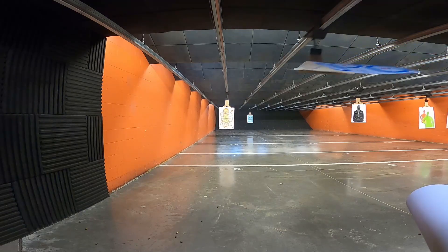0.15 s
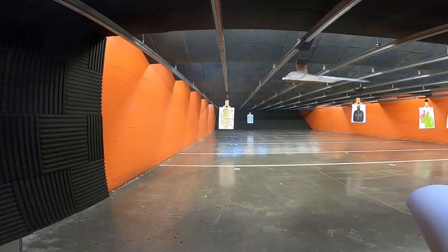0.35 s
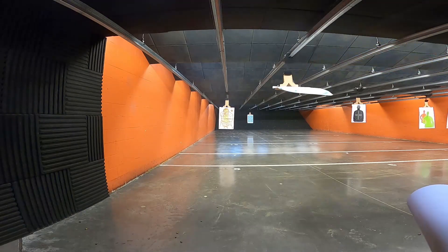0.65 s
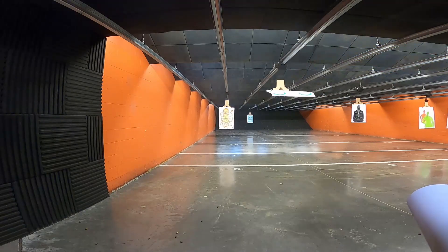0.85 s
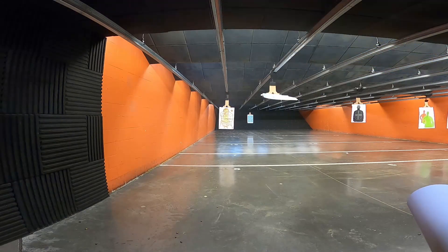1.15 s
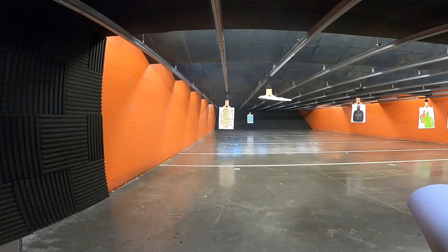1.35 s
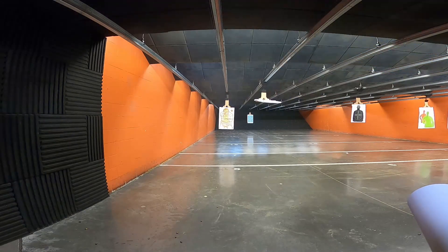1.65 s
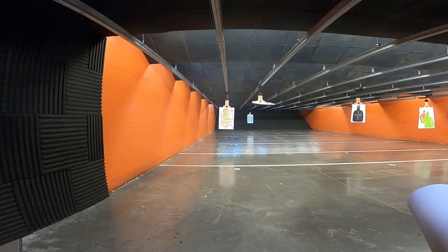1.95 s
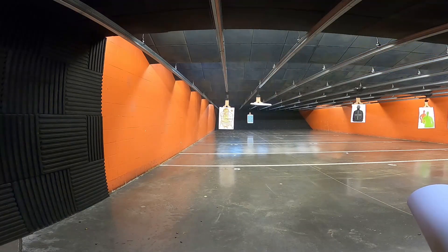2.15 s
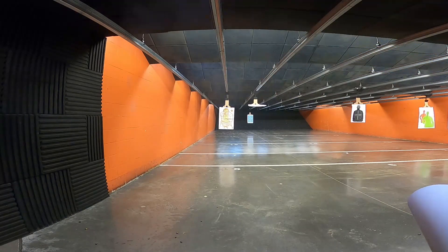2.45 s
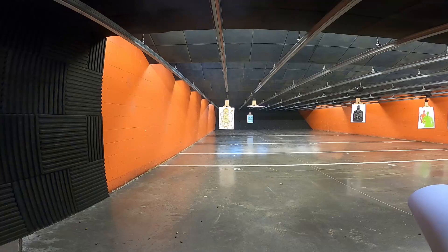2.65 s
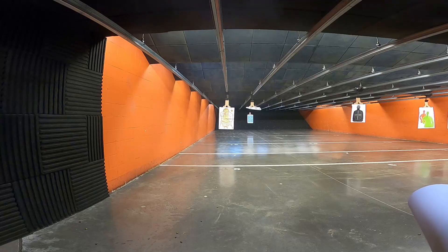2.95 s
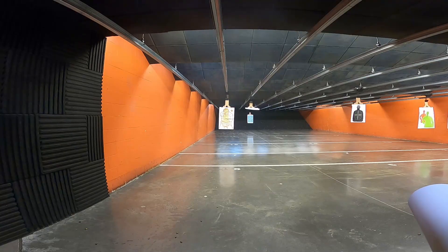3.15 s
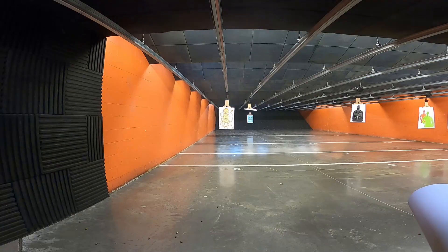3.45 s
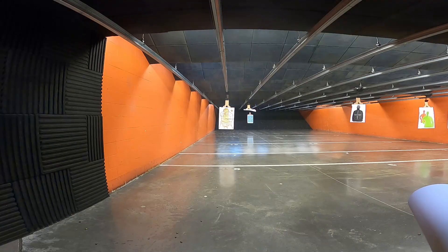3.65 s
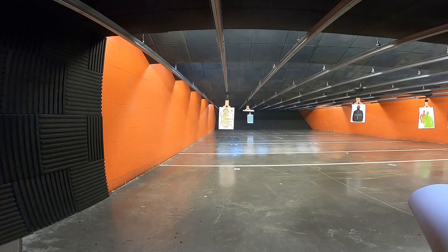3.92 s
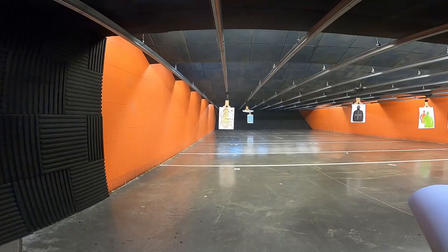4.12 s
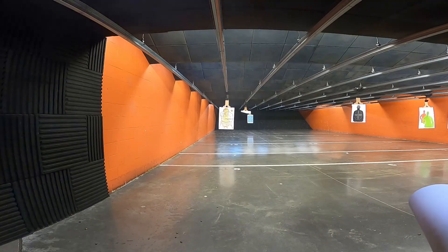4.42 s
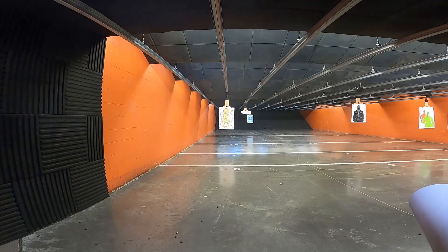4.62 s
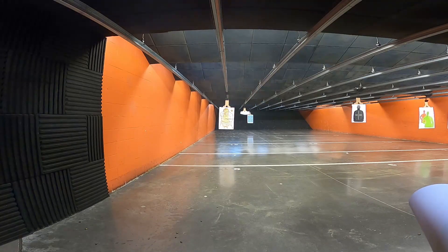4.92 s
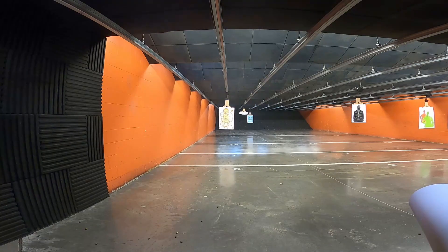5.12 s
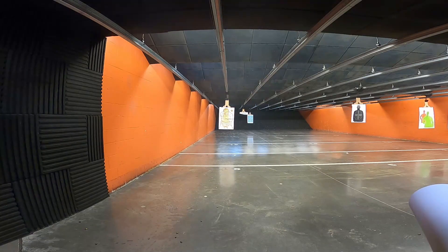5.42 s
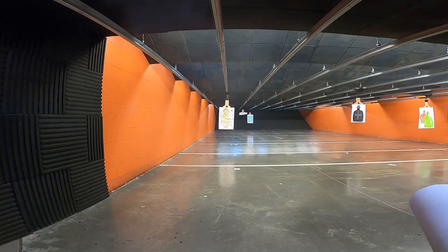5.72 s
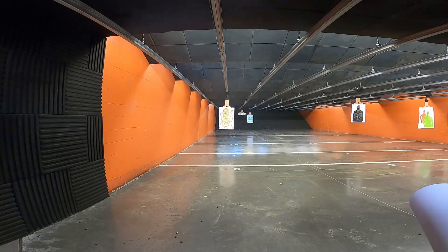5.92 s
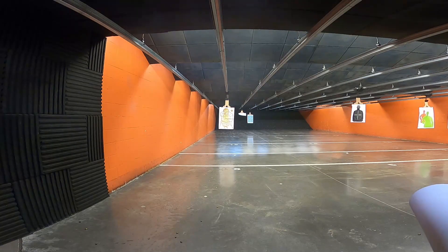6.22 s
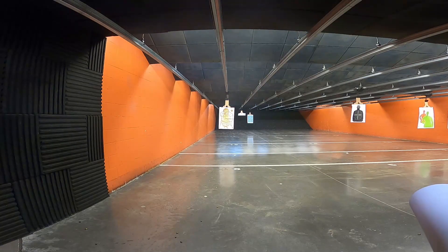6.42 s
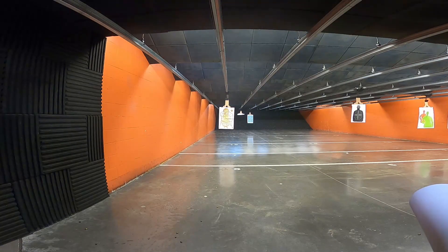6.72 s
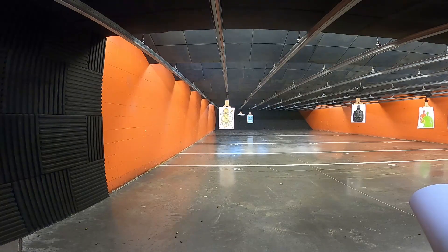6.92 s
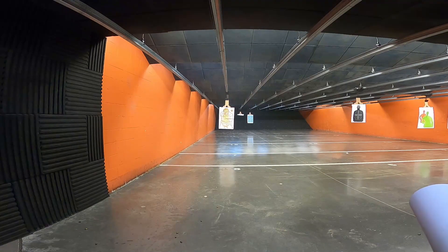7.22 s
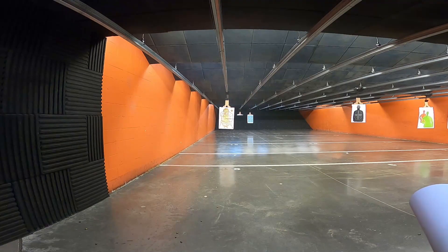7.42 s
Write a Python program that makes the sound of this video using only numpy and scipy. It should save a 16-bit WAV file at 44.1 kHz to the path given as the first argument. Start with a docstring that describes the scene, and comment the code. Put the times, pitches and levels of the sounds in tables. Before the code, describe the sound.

Two pistols fire six single shots at uneven intervals in a long concrete indoor range: one sharp and bright to the left, one duller and heavier to the right. Two come at once, then a pause, three more, another gap and a last one. Each leaves a short dense echo tail. Between them faint brass cases clink, a target carrier rolls and ventilation hums. The close stereo microphone overloads on each blast.

```python
"""Two pistols fire in a long concrete shooting range: a bright one to the left, a duller one to the right.
Each shot is push-suction pulses over bouncing paths, a noise crackle, slaps and swells, and a banded tail.
Brass cases clink (ticks and wavering modes), a carrier rolls and knocks on its rail, soft taps thud.
Ventilation (drifting noise, wavering tones) hums over a deep rumble.
The recorder overloads on each blast; its gain control creeps back up between shots."""
import sys
import numpy as np
from scipy import signal
from scipy.fft import rfft, irfft
from scipy.io import wavfile
from scipy.ndimage import uniform_filter1d

SR = 44100
rng = np.random.default_rng(int(sys.argv[2]) if len(sys.argv) > 2 else 0)


def put_to_file(sound):
    """Save the sound as 16-bit audio at rate SR, in the file named by the first command-line argument."""
    columns = np.atleast_2d(sound).T  # one column per channel
    safe = np.clip(columns, -1, 1)
    whole_steps = np.round(safe * 32767)
    wavfile.write(sys.argv[1], SR, whole_steps.astype(np.int16))


N = 333837

# Shots: t/s, level/dB, pistol (0 dull right, 1 bright left)
SHOTS = [(0.0261, -0.02, 0), (0.4064, -0.074, 1), (2.568, 0.34, 1), (3.4270, 0.44, 0), (4.1477, 0.54, 1),
         (5.681, -0.28, 1)]
# Per pistol: left lag/ms, upper edge f/Hz, low push level/dB, crack level/dB, crack decay/s,
# crack left-right/dB, tail rise/s
PISTOLS = [(0.1, 2000, -14, -21, 0.0061, 4.5, 0.016), (-.03, 6500, -5, -6.5, 0.011, 10, 0.011)]
# Mix per pistol: blast level/dB, reverberation level/dB
PISTOL_LEVELS = [(8.5, -8.5), (1, -7)]
# Bounces off booth, floor and walls, per pistol: first gap/ms, gap growth exponent, fade/ms,
# direct push/ms, reflected push/ms, mean height, height scatter
BOUNCES = [(0.878, 1.6, 3.7, 0.19, 0.48, 1, 0.72), (.4, 1.3, 5.4, 0.1, 0.16, .05, 1.45)]
# Slaps and early swells after the blast, per pistol: delay t/s, level/dB, decay/s
SLAPS = [
    [(.006, -10.5, 0.013), (.018, -9, 0.014), (.031, -12, 0.008), (.046, -8.5, 0.033)],
    [(.0432, -7, 0.0062), (.052, -14, 0.013), (.121, -22.5, 0.034), (.222, -31, .006)],
]
# Spectrum of slaps and swells, per pistol: f/Hz, relative level/dB per Hz
SLAP_COLOURS = [
    [(35, -33), (60, 2.5), (293, -1), (777, -10), (1070, -4), (1760, -14.5), (3000, -17.5), (5090, -26),
     (8980, -37.5), (13500, -52)],
    [(120, -21), (200, 0.5), (537, -9.5), (1110, -3.5), (2800, -9), (6790, -24), (12600, -37.5),
     (13500, -62)],
]
# Reverberation spectrum, per pistol: f/Hz, relative level/dB per Hz
TAIL_COLOURS = [
    [(18, -52), (30, -14), (60, -3.5), (86, -5.5), (143, 3), (189, 1), (377, -8.5), (487, -11.5),
     (582, -5.5), (1220, -16.5), (4170, -23.5), (8520, -37), (13500, -51)],
    [(18, -48), (30, -18.5), (146, 4), (323, -12.5), (367, -10.5), (407, -14.5), (678, -12.5), (811, -18.5),
     (1220, -20), (1890, -25), (4270, -28), (8310, -38.5), (13500, -55.5)],
]


def shots():
    """Shots: one fixed room tail per pistol; near bounces and strength vary from shot to shot."""
    mix = np.zeros((2, N))
    tails = [reverberation(colour, pistol[-1]) for colour, pistol in zip(TAIL_COLOURS, PISTOLS)]
    for s, db, k in SHOTS:
        blast_db, tail_db = PISTOL_LEVELS[k]
        blast = front(arrivals(*BOUNCES[k]), SLAPS[k], SLAP_COLOURS[k], *PISTOLS[k][:-1])
        add(mix, s, gain_of(db + blast_db) * blast)
        add(mix, s, gain_of(db + tail_db) * tails[k])
    return mix


# Crackle spectrum: f/Hz, relative level/dB per Hz
CRACK_COLOUR = [(180, -20), (300, -5), (720, -16.5), (1130, -6.5), (1600, -2), (1790, -15.5), (3430, -6),
                (4430, -17.5), (5360, -21.5), (5800, -27), (8110, -19), (12500, -51.5), (13500, -49)]
# Cavity at the microphone ports: f/Hz, width/Hz, height (linear)
PORT_CAVITY = (5180, 580, 2.13)


def front(paths, slaps, slap_colour, lag_ms, edge_hz, push_db, crack_db, crack_s, pan_db):
    """Blast wave: push-suction pulse per path, near-reflection crackle, cavity ring, low push, slaps."""
    out = np.zeros((2, SR // 4))
    ms = np.arange(SR // 4) * 1000 / SR
    side_lag_ms = np.array([[max(lag_ms, 0)], [max(-lag_ms, 0)]])
    for delay_ms, left, right, push_ms in paths:
        u = np.maximum(ms - delay_ms - side_lag_ms, 0) / push_ms
        pulse = (u > 0) * (1 - u) * np.exp(-.2 * u ** 2)  # push, then suction
        out += np.array([[left], [right]]) * pulse
    out = signal.lfilter(*signal.butter(2, edge_hz, fs=SR), out)
    add(out, 0, gain_of(crack_db) * sides_of(pan_db) * burst(CRACK_COLOUR, 0.00017, crack_s))
    hz, width_hz, height = PORT_CAVITY
    out = out + height * signal.lfilter(*signal.iirpeak(hz, hz / width_hz, fs=SR), out)
    # air of the booth heaves
    heave = np.sin(2 * np.pi * 135 * ms / 1000) * np.exp(-ms / 14.5) * np.minimum(ms / 3.3, 1)
    out -= gain_of(push_db) * heave
    for delay_s, db, decay_s in slaps:
        add(out, delay_s, gain_of(db) * burst(slap_colour, 0.0016, decay_s))
    return out


BOUNCE_COUNT = 10  # paths, direct one included
BOUNCE_LIKENESS = 0.82  # left-right


def arrivals(gap_ms, growth, fade_ms, direct_ms, reflected_ms, mean, scatter):
    """Blast paths, ever further apart and fading: rows of delay/ms, left height, right height, push/ms."""
    k = np.arange(BOUNCE_COUNT)
    draw = rng.standard_normal((BOUNCE_COUNT, 3))
    delay_ms = gap_ms * k ** growth * (1 + 0.088 * draw[:, 0])
    fade = np.exp(-delay_ms / fade_ms)[:, None]
    same = BOUNCE_LIKENESS
    sides = np.c_[draw[:, 1], same * draw[:, 1] + np.sqrt(1 - same ** 2) * draw[:, 2]]
    heights = (mean + scatter * sides) * fade
    # set each side's overall strength before the direct path replaces row 0
    usual = np.hypot(mean, scatter)
    heights = heights * usual * np.linalg.norm(fade) / np.linalg.norm(heights, axis=0)
    heights[0] = 0.72  # direct path
    return np.c_[delay_ms, heights, np.where(k > 0, reflected_ms, direct_ms)]


# Band decay ahead of the knee: f/Hz, t60/s
BAND_T60 = [(40, 0.95), (80, 0.99), (160, 0.59), (320, 0.73), (640, 0.77), (1250, 1), (2500, 0.76),
            (5000, 0.56), (10000, 0.42)]
# Room resonances: f/Hz, width/Hz, lift/dB
ROOM_MODES = [(115, 43, -4), (151, 43, 1.5), (261.7, 20, 4), (311, 65, 2), (369.4, 24, 5), (600, 13, -2),
              (919, 12, -1), (1070, 19, 5), (1150, 11, 4), (1554, 140, 5.5), (1557, 18, 4)]
# Faster decay once the far end of the hall has answered
KNEE_S, KNEE_DB_PER_S = 0.19, -11.5


def reverberation(colour, rise_s):
    """Octave bands of diffuse sound, each with its own decay; bass builds more slowly."""
    n = 2 * SR
    t, hz = np.arange(n) / SR, np.fft.rfftfreq(n, 1 / SR)
    spectrum = diffuse(n, lambda f: read(colour, f) + bumps(ROOM_MODES, f))
    out = np.zeros((2, n))
    for k, (f, t60) in enumerate(BAND_T60):
        share = read([(g, j == k) for j, (g, _) in enumerate(BAND_T60)], hz)
        build = 1 - np.exp(-t / (rise_s + 0.24 / f))
        out += irfft(spectrum * share, n) * gain_of(-60 * t / t60) * build
    out += standing_waves(n)
    knee_db = KNEE_DB_PER_S * np.maximum(t - KNEE_S, 0)
    clumps_db = 0.92 * wander(n, 0.0026)  # reflections arrive in clumps
    return out * gain_of(knee_db + clumps_db)


# Standing waves ahead of the knee: f/Hz, level/dB, t60/s
STANDING = [(104.9, -24.5, 0.93), (142.3, -18, 0.99), (157.2, -9, 0.92), (190, -29, 1), (256, -10.5, 0.7),
            (371, -24.5, 0.98), (1191, -7, 0.4), (1214, -7.5, 0.32)]


def standing_waves(n):
    """Single room modes that build up after a blast and ring on as decaying sines."""
    t = np.arange(n) / SR
    build = 1 - np.exp(-t / 0.017)
    out = np.zeros(n)
    for hz, db, t60 in STANDING:
        out += gain_of(db - 60 * t / t60) * np.sin(2 * np.pi * (hz * t + rng.random())) * build
    return out


# Cases hitting the floor: t/s, tick level/dB, ring level/dB, left-right/dB
CLINKS = [(0.861, -61, -77, 4), (1.286, -54.5, -77, 4.0), (1.9, -75, -71, 10), (2.4294, -67, -74, -1),
          (3.3119, -54, -78, 3.0), (3.9467, -63, -84, 6), (4.935, -59.5, -78, 5), (5.2594, -71, -81, 4),
          (5.5326, -55.5, -82, 1.5), (6.522, -58.5, -67.5, 6), (7.2644, -70, -76, 12), (7.54, -70, -73, 12)]
# High tube modes: f/Hz, level/dB re ring, t60/s
TUBE_MODES = [(11200, 0.5, 0.33), (12850, -5, 0.25)]
# Short mode after the tick: f/Hz, level/dB re tick, t60/s
BODY_MODE = (6000, -8, 0.088)
# Tick spectrum, also of the rail knocks: f/Hz, relative level/dB per Hz
TICK_COLOUR = [(880, -33), (1500, -23), (3340, -9), (4440, -1), (4870, 3), (11100, -15.5), (13500, -38)]


def brass():
    """Brass cases: a tick smeared by the room, then tube modes ringing unevenly as the case tumbles."""
    mix = np.zeros((2, N))
    for s, tick_db, ring_db, pan_db in CLINKS:
        sides = sides_of(pan_db)
        tick = burst(TICK_COLOUR, 0.0028, 0.02)
        tube = sum(ring(*mode) for mode in TUBE_MODES)
        add(mix, s, gain_of(tick_db) * sides * tick)
        add(mix, s, sides * (gain_of(tick_db) * ring(*BODY_MODE) + gain_of(ring_db) * tube))
    return mix


def ring(hz, db, t60):
    """Decaying mode that wavers in pitch and level."""
    t = np.arange(SR // 4) / SR
    turns = np.cumsum(hz + 70 * wander(len(t), 0.0014)) / SR
    level_db = db - 60 * t / t60 + 4.6 * wander(len(t), 0.0044)
    return gain_of(level_db) * np.sin(2 * np.pi * turns) * np.minimum(t / 0.0012, 1)


# Carrier wheels over rail joints: t/s, level/dB
KNOCKS = [(1.1265, -60), (1.6217, -60), (1.7953, -56), (1.93, -52.5), (2.0971, -69), (2.2108, -52.5),
          (2.312, -58), (3.9675, -59), (4.8723, -61), (5.1327, -67)]
# Rail mode: f/Hz, level/dB re knock, t60/s
RAIL_MODE = (4860, -1.5, 0.13)


def rail_knocks():
    """Rail joints: each knock is a soft tick that rings the rail."""
    mix = np.zeros((2, N))
    for s, db in KNOCKS:
        add(mix, s, gain_of(db) * burst(TICK_COLOUR, 0.003, 0.021))
        add(mix, s, gain_of(db) * ring(*RAIL_MODE) * np.ones((2, 1)))
    return mix


# Dull taps down the range: t/s, level/dB
THUDS = [(5.255, -57), (5.291, -53.5), (7.225, -54), (7.51, -57)]
# Tap spectrum: f/Hz, relative level/dB per Hz
THUD_COLOUR = [(400, -25), (900, -11), (1400, 6), (2000, -8), (4000, -5), (8000, -29)]


def thuds():
    """Soft taps blurred by the room: slow-rising noise bursts."""
    mix = np.zeros((2, N))
    for s, db in THUDS:
        add(mix, s, gain_of(db) * burst(THUD_COLOUR, 0.0077, 0.039))
    return mix


# Rolling noise level: t/s, level/dB
CARRIER_LEVEL = [(0, -51.5), (1.1, -56), (2.501, -46.5), (3.202, -57), (4.002, -55.5), (4.798, -59),
                 (5.3, -55), (6.4, -60), (7.25, -55.5), (7.57, -62)]
# Rolling noise spectrum: f/Hz, relative level/dB per Hz
RAIL_COLOUR = [(47, -43), (80, 1.5), (375, -12), (506, -13.5), (885, -14.5), (1010, -11.5), (4820, -23.5),
               (11400, -43.5), (13500, -53)]


def carrier():
    """Target carrier rolling along its rail, with other bustle down the range: drifting noise."""
    level_db = np.interp(np.arange(N) / SR, *np.transpose(CARRIER_LEVEL))
    return gain_of(level_db) * drifting(lambda hz: read(RAIL_COLOUR, hz), patchy_db=2.44, flicker_db=1.47)


# Air noise spectrum: f/Hz, relative level/dB per Hz
VENT_COLOUR = [(41, -56), (70, -8.5), (106, 3.5), (193, -9.5), (399, -19), (592, -28.5), (722, -17),
               (2220, -21.5), (3680, -33), (8890, -54.5), (13500, -76)]
VENT_DB = -55.5
# Narrow fan bands: f/Hz, width/Hz, lift/dB
FAN_BANDS = [(882, 5.6, 11), (723, 9.1, 7), (3860, 90, 5.5), (4880, 120, 16), (5980, 120, 15.5),
             (8800, 750, 20.5), (11400, 150, 4)]
# Fan motor tones: f/Hz, level/dB, waver/Hz
MOTOR_TONES = [(392, -67.5, 2.25), (3750, -79.5, 25)]


def ventilation():
    """Air handling: rumble and hiss with fan bands, plus motor tones wavering in pitch and level."""
    noise = drifting(lambda hz: read(VENT_COLOUR, hz) + bumps(FAN_BANDS, hz), patchy_db=0.5, flicker_db=1.5)
    air = gain_of(VENT_DB) * noise
    for hz, db, waver_hz in MOTOR_TONES:
        turns = np.cumsum(hz + waver_hz * wander(N, 0.08)) / SR
        air = air + gain_of(db + 1.5 * wander(N, .3)) * np.sin(2 * np.pi * turns)
    return air


# Deep rumble level, uneven over time: t/s, level/dB
RUMBLE_LEVEL = [(0, -48), (1.15, -56), (1.5, -48), (2.5, -51), (4.0, -54), (4.9, -57), (5.5, -49.5),
                (6.4, -53), (7.57, -51.5)]


def rumble():
    """Building air plant: deep lumpy noise."""
    level_db = np.interp(np.arange(N) / SR, *np.transpose(RUMBLE_LEVEL))
    colour = [(15, -13), (30, 0.5), (60, 2.0), (90, -26.5), (200, -66.0)]  # f/Hz, relative level/dB per Hz
    return gain_of(level_db) * drifting(lambda hz: read(colour, hz), patchy_db=.6, flicker_db=.8)


# Steady noise: f/Hz, left-right likeness
STEADY_LIKENESS = [(60, 1), (150, 1), (360, 0.95), (890, 0.77), (2200, 0.66), (5400, 0.22), (13300, 0.25)]


def drifting(colour_db, patchy_db, flicker_db):
    """Steady noise, rms 1, whose level drifts in patches of time and frequency."""
    noise = irfft(diffuse(N + 1, colour_db, STEADY_LIKENESS), N + 1)
    hz, t, z = signal.stft(noise, SR, nperseg=1024, noverlap=768)
    patches = rng.standard_normal((len(t), len(hz))).T
    patches = uniform_filter1d(patches, 10, 0)  # over bins
    patches = evened(uniform_filter1d(patches, 14, 1))  # over frames
    flicker = evened(uniform_filter1d(rng.standard_normal(len(t)), 12))
    z = z * gain_of(patchy_db * patches + flicker_db * flicker)
    x = signal.istft(z, SR, nperseg=1024, noverlap=768)[1]
    return evened(x[:, :N])


# Sound from one direction: f/Hz, left-right likeness
FRONT_LIKENESS = [(300, .97), (2000, .88), (6000, .75), (13000, .75)]


def burst(colour, rise_s, decay_s):
    """Short noisy volley of reflections: linear rise, exponential decay."""
    t = np.arange(SR // 10) / SR
    noise = irfft(diffuse(len(t), lambda hz: read(colour, hz), FRONT_LIKENESS), len(t))
    return noise * np.exp(-t / decay_s) * np.minimum(t / rise_s, 1)


# Reverberation: f/Hz, left-right likeness
SHOT_LIKENESS = [(40, .88), (100, .94), (300, .95), (700, .82), (1500, .76), (3000, .6), (6000, .35),
                 (13000, .2)]
# Stereo balance: f/Hz, left-right/dB
BALANCE = [(60, .8), (250, .7), (600, .1), (1300, 1.5), (4000, 1.5), (8000, .2), (13000, -.8)]
LEFT_LAG_S = 4e-5


def diffuse(n, colour_db, likeness=SHOT_LIKENESS):
    """Spectrum of stereo noise, rms 1, as two close microphone ports hear a diffuse field."""
    hz = np.fft.rfftfreq(n, 1 / SR)
    left, other = rfft(rng.standard_normal((2, n)))
    same = np.clip(read(likeness, hz), 0, 1)
    right = same * left + np.sqrt(1 - same ** 2) * other
    z = np.array([left * np.exp(-2j * np.pi * hz * LEFT_LAG_S), right])
    z = z * gain_of(colour_db(hz) + np.outer([.5, -.5], read(BALANCE, hz)))
    return z / np.sqrt(np.mean(irfft(z, n) ** 2))


def wander(n, span_s):
    """Random drift, rms 1, smoothed twice over span_s."""
    width = max(round(span_s * SR), 1)
    return evened(uniform_filter1d(uniform_filter1d(rng.standard_normal(n), width), width))


def gain_of(db):
    """Decibels to gain."""
    return 10 ** (np.asarray(db) / 20)


def sides_of(pan_db):
    """Left and right gains for a left-right difference."""
    return gain_of(pan_db * np.array([[.5], [-.5]]))


def evened(x):
    """Scales to rms 1."""
    return x / np.sqrt(np.mean(x ** 2) + 1e-20)


def read(points, hz):
    """Reads a table on a log-frequency axis."""
    f, value = np.transpose(points)
    return np.interp(np.log(hz + 1), np.log(f + 1), value)


def bumps(peaks, hz):
    """Resonant lifts in dB."""
    return sum(db / (1 + (2 * (hz - f) / width) ** 2) for f, width, db in peaks)


def add(mix, s, sound):
    """Mixes a stereo sound in at time s."""
    part = mix[:, round(s * SR):][:, :sound.shape[1]]
    part += sound[:, :part.shape[1]]


def scene():
    """Shots over the sounds of the range."""
    return shots() + brass() + rail_knocks() + thuds() + carrier() + ventilation() + rumble()


def held(power_db, db_per_s):
    """Follows rises at once and falls at a set rate."""
    fall = np.arange(N) * db_per_s / SR
    return np.maximum.accumulate(power_db + fall) - fall


# Narrow lifts that ring both ways in time: f/Hz, width/Hz, level/dB of the added band
EQUALISER = [(900, 60, -10), (8000, 40, -3)]
EDGE_HZ = 13150


def record(dry):
    """Zero-phase equaliser, slow gain control, quick limiter, overload and band limit."""
    hz = np.fft.rfftfreq(N + SR, 1 / SR)
    lift = 1 + sum(gain_of(db) * np.exp(-((hz - f) / width) ** 2) for f, width, db in EQUALISER)
    x = irfft(rfft(dry, N + SR) * lift, N + SR)[:, :N]
    power = signal.lfilter([.004], [1, -.996], (x ** 2).mean(0))
    power_db = 10 * np.log10(abs(power) + 1e-12)
    # loud sound pins the slow gain down; once it dies away the gain climbs back
    slow_db = np.maximum(held(np.minimum(power_db, -36), db_per_s=5.0), -50) + 39
    quick_db = 0.57 * np.maximum(held(power_db, db_per_s=265.0) + 28.5, 0)
    # gain reacts late, so the first of each blast overloads
    react = 1 / (.0008 * SR)
    cut_db = signal.lfilter([react], [1, react - 1], slow_db + quick_db) - 3.5
    x = x / gain_of(cut_db)
    x = 0.34 * np.tanh(x / 0.46)
    x = signal.lfilter(*signal.butter(1, 11000, fs=SR), x)  # converter dulls the top
    band_limit = signal.firwin(511, EDGE_HZ, window=("kaiser", 9), fs=SR)
    return signal.oaconvolve(x, band_limit[None], "same")


dry = scene()
out = record(dry)
put_to_file(out)
```